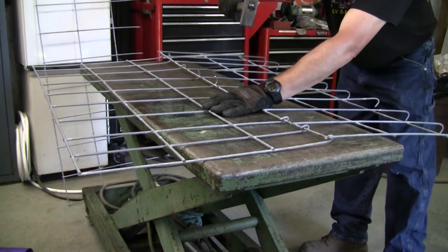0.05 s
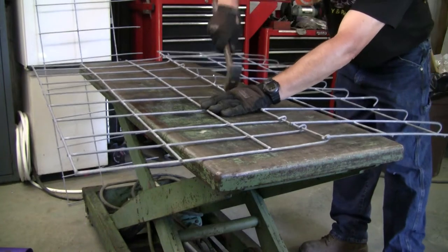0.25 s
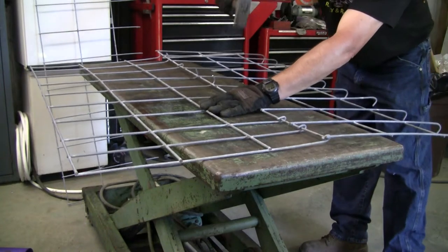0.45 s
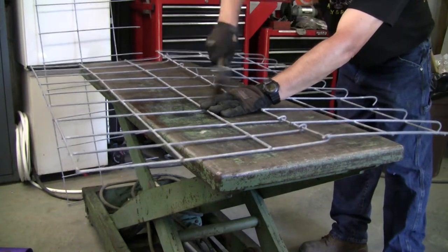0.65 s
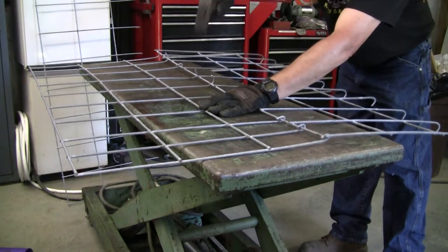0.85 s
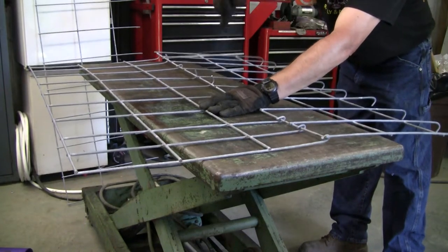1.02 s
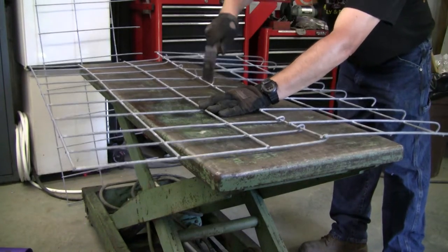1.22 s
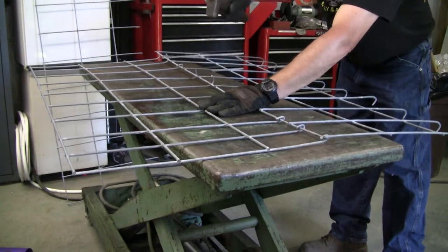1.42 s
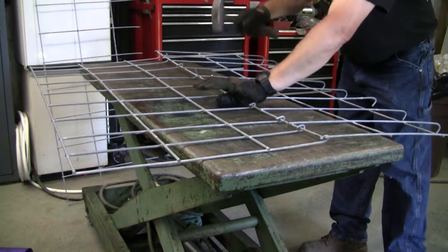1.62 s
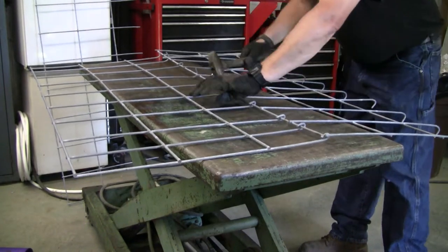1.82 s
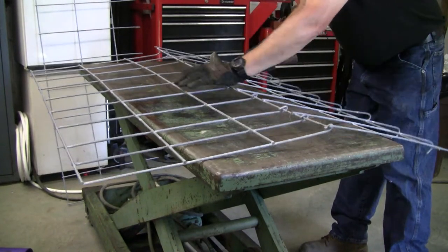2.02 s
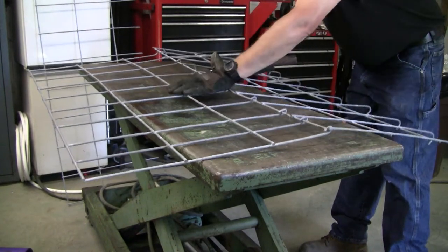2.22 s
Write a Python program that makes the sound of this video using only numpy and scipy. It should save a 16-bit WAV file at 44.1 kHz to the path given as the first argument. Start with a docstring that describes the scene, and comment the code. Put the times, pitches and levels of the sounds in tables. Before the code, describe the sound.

A hammer strikes a wire mesh panel on a steel table three times, each blow ringing and rattling. The hammer is then set down with a dull double knock, and the panel clinks faintly in a workshop.

```python
"""A hammer strikes a welded wire panel three times on a steel work table in a workshop.
Each blow thumps the table, sets the wires ringing and leaves the panel chattering on the top.
The hammer is then set down with a duller knock, and the panel scrapes and clinks as a hand shifts it.
One microphone, on the left channel, hears it all; a compressor and a limiter turn loud moments down."""
import sys
import numpy as np
from scipy import signal
from scipy.fft import rfft, irfft
from scipy.io import wavfile
from scipy.ndimage import uniform_filter1d

SR = 44100
rng = np.random.default_rng(int(sys.argv[2]) if len(sys.argv) > 2 else 0)


def master(y):
    """Save y as 16-bit WAV."""
    cut = np.clip(np.atleast_2d(y).T, -1, 1)
    pcm = np.round(cut * 32767)  # scale
    wavfile.write(sys.argv[1], SR, pcm.astype(np.int16))


N = 103635
T = np.arange(N) / SR

# Hammer blows. The chatter fades slowly for hold_s, then faster:
# start_s, crack_db, thump_db, ring_db, chatter_db, hold_s, fall_db_per_s, rise_s
BLOWS = [(0.2213, -3.5, -5.5, -16, -6.5, 0.156, 81, 0.0059), (0.668, 4, 1, -9, -7.5, 0.176, 90, 0.0048),
         (1.1473, 4, 6.5, -8, -4.5, 0.272, 109, 0.0042)]
# The flexing panel swings back onto the table and chatters again: peak_s, level_db, half_width_s
REBOUNDS = [(0.316, -6.5, 0.0176), (0.421, -16, 0.0313), (0.585, -22.5, 0.011), (0.797, -16, 0.0125),
            (1.042, -26, 0.00967), (1.398, -13, 0.0229), (1.515, -17.5, 0.00565)]
# The clear tones (modes) of panel and table. A t60 is the time a sound takes to fade by 60 dB.
# pitch_hz: (t60_s, blow_1_db, blow_2_db, blow_3_db, head_knock_db)
MODES = {141.5: (1.0648, -12, -15.5, -10, -30.5), 220: (2.25, -51.5, -32, -46.5, -27),
         335: (0.9227, -7, -8, -2.5, 0.5), 394: (0.8481, -24.5, -21.5, -13.5, -21.5),
         590: (0.8269, -14, -17.5, -13, -13.5), 657.5: (0.9746, -18, -13, -13.5, -15),
         787: (.8, -32.5, -17, -30.5, -15), 925.5: (0.5617, -14.5, -12, -23, -39.5),
         1050: (.22, -29, -7.5, -24, -9), 1138: (1, -31, -19, -8, -18),
         1274: (0.7187, -20.5, -10, -9.5, -27), 1360: (0.1044, -27, -6.5, -19.5, 4),
         1473: (.62, -16, -2, -12, -15), 1519: (0.66, -20.5, -9.5, -13, -32),
         1681: (1.0174, -31, -17.5, -14, -13.5), 1755: (0.44, -25, -11.5, -36, -6),
         2101: (0.8, -12, -10.5, -19, -24), 2378: (0.8875, -27.5, -11.5, -15.5, -17),
         2739: (0.53, -16.5, -12.5, -24.5, -34), 3092: (1.1639, -22, -33, -22, -27.5),
         3460: (0.6482, -18, -33.5, -28, -17), 6738: (0.01, -34.5, -19, -24, -46.5),
         9225: (0.2644, -28, -41.5, -27.5, -58.5)}
# The hammer is set down, head first, then handle: start_s, level_db, t60_s
KNOCKS = [(1.8211, 9, 0.079), (1.957, -2.5, 0.1043)]
# The panel scrapes under the hand: time_s, level_db
SCRAPE_LEVELS = [(1.58, -60.5), (1.68, -44.5), (1.85, -42.5), (2.02, -33), (2.11, -46), (2.17, -57),
                 (2.28, -45.5), (2.35, -60)]
# The panel clinks as it moves: start_s, level_db, loose_wire_db
CLINKS = [(1.640, -26, -38), (1.665, -22.5, -53.5), (2.019, -53, -60.5), (2.215, -23.5, -29),
          (2.3415, -20, -22)]
# The tones of one loose wire: pitch_hz, relative_db, t60_s
LOOSE_WIRE = [(944, 1.5, 0.5), (1959, -7.5, .3), (2030, -4.5, 0.19), (2700, -3, 0.0704), (3111, 6.5, 0.043),
              (3395, -8, 0.09)]

# Tone colours, or how strong each sound is from bass to treble: pitch_hz, relative_db
CRACK_COLOUR = [(150, -14.5), (500, 10), (1500, 1), (3000, 9), (4500, -6), (7000, -5.5), (10000, -16.5),
                (15000, -24.5)]  # hammer on wire
THUMP_COLOUR = [(25, -25), (60, -6), (130, -1), (220, 1), (350, 1), (700, 0), (1300, -20.5), (4000, -34)]  # table under the blow
WIRE_COLOUR = [(500, 5.5), (700, 8), (1500, 9.5), (2500, -10.5), (3500, -13.5), (4300, -13.5), (7000, -8),
               (11000, -20.5)]  # ringing wires
CHATTER_COLOUR = [(25, -14), (60, -1.5), (110, -3.5), (230, -4.5), (320, 5), (700, -6), (2000, 3.5),
                  (3500, 1), (4300, -7), (7000, -12.5), (10000, -23), (15000, -34.5)]  # panel bouncing on the table
HEAD_COLOUR = [(30, -27), (80, -12), (200, -14), (450, -0.5), (800, -1.5), (1600, -2.5), (2500, -9),
               (3500, -11.5), (4500, -24.5), (8000, -36.5), (15000, -55)]  # hammer head set down
HANDLE_COLOUR = [(25, -48.5), (100, -28), (220, -5), (400, -2), (750, 2.5), (1100, -0.5), (2500, -6),
                 (4500, -36.5), (15000, -51)]  # handle landing
SCRAPE_COLOUR = [(25, -6), (60, 4.5), (300, 6.5), (1500, 0), (3500, -2.5), (5000, -7.5), (9000, -11.5),
                 (15000, -25.5)]  # panel sliding
CLINK_COLOUR = [(100, -8.5), (500, -4), (1800, -3), (2700, -5), (3300, 2), (4300, -10), (8000, -16.5),
                (15000, -32.5)]  # wires clinking
BACKGROUND_COLOUR = [(20, 3), (50, -3), (100, -5), (142, 1.5), (200, 4), (245, -10), (330, 3), (420, -2.5),
                     (800, -1.5), (2100, -3.5), (3300, -10.5), (4500, -16), (8700, -30), (15000, -35)]  # steady workshop noise

COMPRESSOR = dict(threshold_db=-15.5, share=0.677, attack_s=0.0187,
                  release_db_per_s=160.5, window_s=0.00707)
LIMITER = dict(threshold_db=-4.5, share=1, attack_s=0.000164, release_db_per_s=412, window_s=0.0038)
RIGHT_LEAK_DB, CUTOFF_HZ = -51, 15800


def hammer_blows(crack_t60_s=0.097, thump_t60_s=0.0903, chatter_ring_db=-12):
    """Each blow cracks on the panel and thumps the table; blows and chatter both ring the wires."""
    taps, cracks, thumps = np.zeros(N), [], []
    for start, crack_db, thump_db, ring_db, *_, rise_s in BLOWS:
        taps[int(start * SR)] = from_db(ring_db)
        cracks.append((start, crack_db, crack_t60_s, rise_s))
        thumps.append((start, thump_db, thump_t60_s, rise_s))
    chatter, wires = panel_chatter(), wire_ring()
    pushes = taps + from_db(chatter_ring_db) * chatter / np.linalg.norm(wires)
    ringing = signal.fftconvolve(pushes, wires)[:N]
    impacts = bursts(cracks, CRACK_COLOUR) + bursts(thumps, THUMP_COLOUR)
    return impacts + colour(chatter, CHATTER_COLOUR) + ringing


def panel_chatter(sag_db_per_s=53.5, rise_s=0.00202):
    """The struck panel bounces on the table, fading away and swelling again at each rebound."""
    bounce = np.zeros(N)
    for start, _, _, _, chatter_db, hold_s, fall_db_per_s, _ in BLOWS:
        age = np.maximum(T - start, 0)
        fade_db = sag_db_per_s * np.minimum(age, hold_s) + fall_db_per_s * np.maximum(age - hold_s, 0)
        bounce += (1 - np.exp(-age / rise_s)) * from_db(chatter_db - fade_db)
    for peak_s, db, half_width_s in REBOUNDS:
        rebound = from_db(db) * np.exp(-.5 * ((T - peak_s) / half_width_s) ** 2)
        bounce = np.hypot(bounce, rebound)  # their powers add
    return bounce * metal_clicks()


def wire_ring(count=700, t60_at_1khz_s=0.624):
    """One tap makes the welded wires ring with a crowd of close tones; the high ones fade sooner."""
    ring, power = np.zeros(N), 0
    tap = signal.unit_impulse(N)
    places = (np.arange(count) + rng.random(count)) / count
    pitches = np.interp(places, [0, 1], np.sqrt([500, 11000])) ** 2
    for hz, sign in zip(pitches, rng.choice([-1, 1], count)):
        gain = sign * from_db(at_hz(WIRE_COLOUR, hz)) * hz ** .25  # makes up for sparser high tones
        t60_s = t60_at_1khz_s * (1000 / hz) ** 0.315
        turn = 2 * np.pi * hz / SR
        fade = from_db(-60 / (SR * t60_s))
        ring += signal.lfilter([0, gain * np.sin(turn)], [1, -2 * fade * np.cos(turn), fade * fade], tap)
        power += gain ** 2 / 2
    return ring / np.sqrt(power)


def panel_and_table_tones(swell_cycles=1.86, damped_t60_s=.17):
    """Each strike favours different tones. Rattling makes them waver; the landing handle damps them."""
    head_s, handle_s = KNOCKS[0][0], KNOCKS[1][0]
    strikes = [blow[0] for blow in BLOWS] + [head_s]
    ringing = np.zeros(N)
    for hz, (t60_s, *levels) in MODES.items():
        unrest = np.sqrt(min(hz, 3000) / 1000)  # higher tones are less steady
        wander_rad = 0.49 * unrest * drift(40)
        waver_db = 1.5 * unrest * drift(21.928)
        for start, db in zip(strikes, levels):
            ringing += from_db(db + waver_db) * tone(start, hz, t60_s, swell_cycles, wander_rad)
    return ringing * np.where(T < handle_s, 1, decay(handle_s, damped_t60_s))


def hammer_set_down(rise_s=0.0034):
    """The head knocks on the table, then the handle drops with a hollow clop."""
    head, handle = KNOCKS
    return bursts([(*head, rise_s)], HEAD_COLOUR) + bursts([(*handle, rise_s)], HANDLE_COLOUR)


def shifting_panel(clink_t60_s=0.051, rise_s=0.00061):
    """Wires scrape and clink as the hand moves the panel; each clink rings a loose wire."""
    scrape_db = np.interp(T, *np.transpose(SCRAPE_LEVELS), left=-np.inf)
    scrape = colour(metal_clicks() * from_db(scrape_db), SCRAPE_COLOUR)
    clinks = bursts([(start, db, clink_t60_s, rise_s) for start, db, _ in CLINKS], CLINK_COLOUR)
    rings = sum(from_db(ring_db + db) * tone(start, hz, t60_s, swell_cycles=10.5)
                for start, _, ring_db in CLINKS for hz, db, t60_s in LOOSE_WIRE)
    return scrape + clinks + rings


def metal_clicks(clicks_per_s=520, spread_db=1.5, t60_s=0.01745):
    """Metal touches metal at random moments, and each touch is a tiny burst of noise."""
    sizes = from_db(spread_db * np.minimum(rng.exponential(1, N), 4))
    clicks = sizes * (rng.random(N) < clicks_per_s / SR)
    power = signal.fftconvolve(clicks ** 2, decay(0, t60_s) ** 2)[:N]
    rattle = np.sqrt(np.abs(power)) * rng.standard_normal(N)
    return rattle / np.sqrt(np.mean(rattle ** 2) + 1e-20)  # average power of one


def workshop_echo(sound, level_db=-2.5, t60_s=0.5037, treble_t60_s=0.286, treble_hz=3780):
    """The room sends the sound back as a smooth wash of echoes whose treble dies sooner."""
    noise = rng.standard_normal(N)
    low = signal.sosfilt(signal.butter(2, treble_hz, fs=SR, output="sos"), noise)
    high = signal.sosfilt(signal.butter(2, treble_hz, "high", fs=SR, output="sos"), noise)
    tail = low * decay(.005, t60_s) - high * decay(0.0025, treble_t60_s)
    return from_db(level_db) * signal.fftconvolve(sound, tail / np.linalg.norm(decay(0, t60_s)))[:N]


def workshop_background(level_db=-40):
    """A soft, steady rush of noise fills the room."""
    return from_db(level_db) * colour(rng.standard_normal(N), BACKGROUND_COLOUR)


def bursts(rows, spectrum):
    """Impacts made of short puffs of noise, from rows of start_s, level_db, t60_s, rise_s."""
    level = np.zeros(N)
    for start, db, t60_s, rise_s in rows:
        rise = 1 - np.exp(-np.maximum(T - start, 0) / rise_s)
        level += from_db(db) * decay(start, t60_s) * rise
    return colour(rng.standard_normal(N) * level, spectrum)


def tone(start, hz, t60_s, swell_cycles, wander_rad=0):
    """One struck tone: it builds up over a few cycles and dies away."""
    cycles = hz * np.maximum(T - start, 0)
    swell = 1 - np.exp(-cycles / swell_cycles)
    return decay(start, t60_s) * swell * np.sin(2 * np.pi * cycles + wander_rad)


def decay(start, t60_s):
    """Jump to one, then die away."""
    return (T >= start) * from_db(-60 * np.maximum(T - start, 0) / t60_s)


def drift(steps_per_s):
    """Glide from one random value to the next."""
    return np.interp(T * steps_per_s, np.arange(400), rng.standard_normal(400))


def colour(sound, spectrum, size=8192):
    """Give a sound a tone colour; white noise keeps its power."""
    gains = from_db(at_hz(spectrum, np.fft.rfftfreq(size, 1 / SR)))
    # Fold the filter so that it never sounds before the hit.
    cepstrum = irfft(np.log(gains))
    cepstrum[1:size // 2] *= 2
    cepstrum[size // 2 + 1:] = 0
    pulse = irfft(np.exp(rfft(cepstrum)))
    return signal.fftconvolve(sound, pulse / np.linalg.norm(pulse))[:N]


def at_hz(spectrum, hz):
    """Look up a tone colour's level in dB at any pitch."""
    pitches, levels = np.transpose(spectrum)
    return np.interp(np.log(hz + 1e-3), np.log(pitches), levels)


def from_db(db):
    """Turn decibels into a number to multiply by."""
    return 10 ** (np.asarray(db) / 20)


def compress(sound, threshold_db, share, attack_s, release_db_per_s, window_s):
    """Turn loud moments down by a share of their level above the threshold."""
    power = np.maximum(uniform_filter1d(sound ** 2, max(int(window_s * SR), 1)), 1e-12)
    over_db = np.maximum(10 * np.log10(power) - threshold_db, 0)
    held_db = np.maximum.accumulate(over_db + release_db_per_s * T) - release_db_per_s * T
    lag = np.exp(-1 / (attack_s * SR))
    smooth_db = signal.lfilter([1 - lag], [1, -lag], held_db)
    return sound * from_db(-share * smooth_db)


def scene():
    """Everything as it reaches the one microphone."""
    work = hammer_blows() + hammer_set_down() + shifting_panel()
    background = workshop_background()
    mic = work + workshop_echo(work) + panel_and_table_tones() + background
    return np.array([mic, from_db(RIGHT_LEAK_DB) * mic])


def record(dry):
    """Tame the peaks on the left, leak a trace to the right and cut the highest treble."""
    compressed = compress(dry[0], **COMPRESSOR)
    limited = compress(compressed, **LIMITER)
    left = limited / (1 + limited ** 6) ** (1 / 6)  # round off the peaks
    both = np.array([left, from_db(RIGHT_LEAK_DB) * left])
    return signal.sosfilt(signal.ellip(10, .1, 80, CUTOFF_HZ, fs=SR, output="sos"), both)


dry = scene()
out = record(dry)
master(out)
```